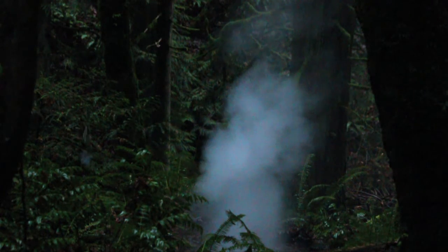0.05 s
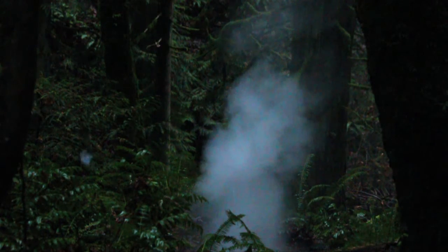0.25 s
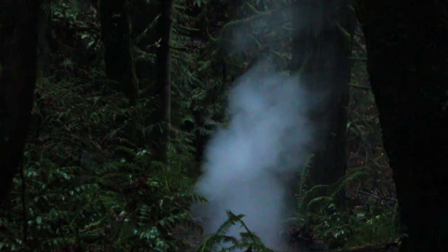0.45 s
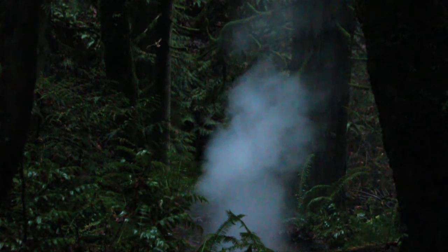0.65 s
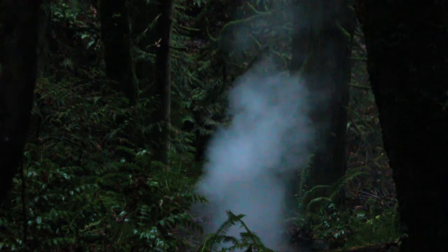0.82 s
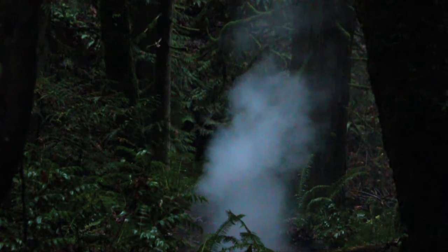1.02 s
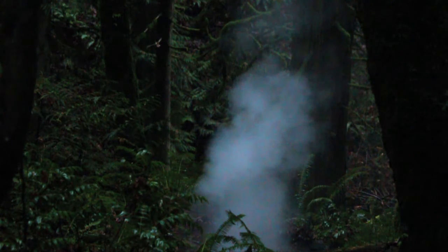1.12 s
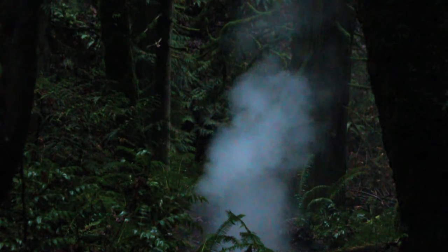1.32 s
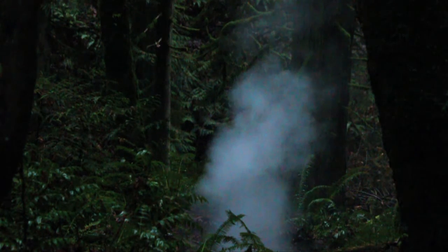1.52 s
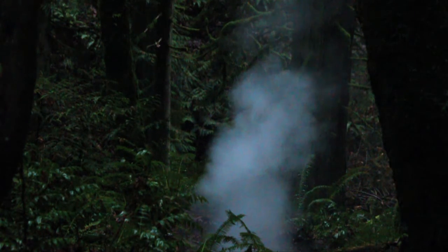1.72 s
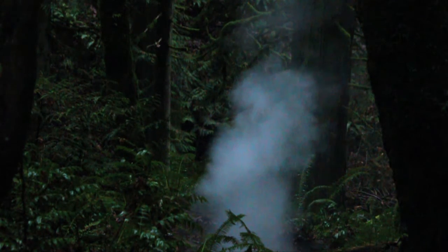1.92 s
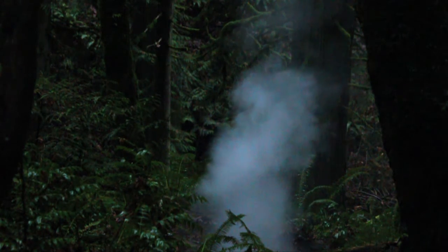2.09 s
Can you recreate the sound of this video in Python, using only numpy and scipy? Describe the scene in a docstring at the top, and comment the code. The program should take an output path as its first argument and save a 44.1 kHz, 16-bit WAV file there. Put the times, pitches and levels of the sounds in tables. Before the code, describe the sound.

Fragments thud and crack onto a forest floor, slowed down, deep and muffled. Knocks begin at about 0.15 seconds, with a hard hit at 0.25 and the heaviest, slightly distorted, at 0.3. From 0.5 to 2 seconds softer, scattered knocks and gritty ticks follow, a little stronger near 1.3 and 1.75. Each echoes briefly among the trees, over a faint low rumble and fine patter of debris.

```python
"""Fragments of a burst pot land in a forest, heard slowed down, so all is deep and dull.
Each gives one push and pull of air, a short ring and some grit; the trees scatter it back.
Fine debris patters over a low rumble and crackles on leaves in a faint hiss.
The hardest blow overloads and flattens at full scale."""
import sys
import numpy as np
from scipy import signal
from scipy.fft import rfft, irfft, next_fast_len
from scipy.io import wavfile
from scipy.ndimage import map_coordinates

SR = 44100
rng = np.random.default_rng(int(sys.argv[2]) if len(sys.argv) > 2 else 0)


def persist_wave(psi):
    """Save psi, clipped to +-1, as 16-bit WAV."""
    counts = np.round(np.clip(psi, -1, 1) * 32767).astype(np.int16)
    wavfile.write(sys.argv[1], SR, np.atleast_2d(counts).T)


N = 94815

# Spectrum of hiss and leaf crackle. Each row: frequency in Hz, level in dB.
HISS_SPECTRUM = [(100, -15), (500, -6.5), (850, 4), (1200, -0.5), (1550, 3.5), (2100, -1), (2600, -48)]


def amp(db):
    """Decibels to gain."""
    return 10 ** (np.asarray(db) / 20)


def filtered(x, response):
    """x filtered by response(hz), a gain."""
    size = next_fast_len(len(x) + 8192)
    return irfft(rfft(x, size) * response(np.fft.rfftfreq(size, 1 / SR)), size)[:len(x)]


def coloured(x, spectrum):
    """x shaped by (Hz, dB) points, at rms 1."""
    points_hz, db = np.transpose(spectrum)
    shaped = filtered(x, lambda hz: amp(np.interp(np.log(hz + 1), np.log(points_hz + 1), db)))
    return shaped / np.sqrt(np.mean(shaped ** 2) + 1e-20)


def noise(spectrum, size=N):
    """Coloured noise at rms 1."""
    return coloured(rng.standard_normal(size), spectrum)


def wobble(knots_per_s):
    """Smooth random curve."""
    return map_coordinates(rng.standard_normal(256), [np.arange(N) * knots_per_s / SR], mode="mirror")


def envelope(points):
    """Gain curve through (s, dB) points."""
    return amp(np.interp(np.arange(N) / SR, *np.transpose(points)))


def thud(t_s, width_ms, rebound_ms):
    """One push of air, then a wider pull that gives most of it back."""
    spread, share = 2.02, 0.88  # pull over push: width, area
    t_ms = t_s * 1000
    push = np.exp(-(t_ms / width_ms) ** 2)
    pull = np.exp(-((t_ms - rebound_ms) / (spread * width_ms)) ** 2)
    return push - share / spread * pull


def rumble():
    """Low rush, wavering slightly."""
    # Each row: frequency in Hz, level in dB.
    spectrum = [(10, -19), (25, 0.5), (60, -3), (115, -0.5), (180, -10), (300, -7), (520, -13),
                (800, -21.5), (2200, -33)]
    return amp(0.4 * wobble(knots_per_s=12.88)) * noise(spectrum)


def hiss():
    """Midrange noise with a flickering level."""
    return amp(2.3 * wobble(knots_per_s=25)) * noise(HISS_SPECTRUM)


def crackle(ticks_per_s=200, spread_db=6):
    """Specks hit leaves: dense ticks coloured like the hiss."""
    when, size = rng.random((int(ticks_per_s * N / SR), 2)).T
    ticks = np.bincount((when * N).astype(int), amp(spread_db * size), N)
    return coloured(ticks, HISS_SPECTRUM)


def patter(thuds_per_s=60, median_width_ms=0.81, spread_db=10):
    """Fine debris lands: tiny thuds at random moments."""
    out = np.zeros(N + SR)
    t_s = np.arange(-256, 768) / SR
    for when, size, width in rng.random((int(thuds_per_s * N / SR), 3)):
        width_ms = median_width_ms * 2 ** (3 * (width - 0.5))
        pulse = thud(t_s, width_ms, rebound_ms=3 * width_ms)
        out[int(when * N):][:len(t_s)] += amp(spread_db * (size + 0.5)) * pulse
    return out[:N]


def background():
    """Rumble with patter and hiss with crackle, each pair on one level curve."""
    # Each row: time in seconds, gain in dB.
    low_levels = [(0.0, -41.5), (0.15, -43.5), (0.32, -40), (0.36, -38.5), (0.52, -50), (0.77, -48),
                  (2.04, -41.5), (2.15, -42.5)]
    high_levels = [(0, -57.5), (.2, -58), (.5, -62), (.7, -66), (1.15, -61.5), (1.35, -66), (1.48, -58.5),
                   (1.55, -52), (1.64, -62), (2.0, -59.5), (2.15, -60.5)]
    low = rumble() + amp(-4.5) * patter()
    high = hiss() + amp(-3.5) * crackle()
    return envelope(low_levels) * low + amp(-1) * envelope(high_levels) * high


def forest_echo(blow, level_db=-18, t60_s=0.52, rise_s=0.0037):
    """Trunks and undergrowth scatter a blow back; level_db is relative to the blow."""
    # Each row: frequency in Hz, echo level in dB.
    spectrum = [(20, -12.5), (70, -6), (130, -0.5), (200, -12.5), (400, 0), (700, -12.5), (1000, -2),
                (2200, -31.5)]
    t_s = np.arange(SR // 2) / SR
    tail = noise(spectrum, len(t_s)) * amp(-60 * t_s / t60_s) * (1 - np.exp(-t_s / rise_s))
    echo = signal.fftconvolve(blow, tail)[:N]
    return amp(level_db) * echo * np.linalg.norm(blow) / (np.linalg.norm(echo) + 1e-12)


def fragments(ring_t60_s=0.035, grit_t60_s=0.028):
    """Each piece thuds, crunches the litter, rings from its rebound on and echoes."""
    # Each row: time in seconds, level in dB, push width in ms, rebound delay in ms,
    # ring pitch in Hz, ring and grit levels in dB relative to the push.
    landings = [ (.1630, -14.5, .33, 2.23, 293, -16, -21.5), (0.172, -15, 0.8, 4.04, 202, -2, -12),
                (.2480, -11.5, 1.34, 3.6, 95, 8.5, -24.5), (0.2495, 0.5, 0.36, 0.79, 410, -9, -33.5),
                (0.2564, -8.5, 0.68, 4.2, 330, -18.5, -24), (.2790, -19.5, 0.49, 3.0, 170, -13, -25.5),
                (.3040, -18.5, 0.42, 2, 400, -2, -46), (0.3185, 6.5, 0.832, 2.5, 117.6, -14, -23),
                (0.322, 2.5, 0.56, 1, 184.5, -1.5, -28.5), (0.355, -18, 2.8, 9.2, 120.2, -17.5, -37),
                (0.3751, -18, 0.62, 0.91, 244, 0, -21), (0.427, -10.5, 1.19, 3.6, 85, 0.5, -35.5),
                (0.5688, -28.5, 0.86, 2.86, 148, 3, -12.5), (0.747, -19.5, 0.29, 1.4, 264.6, -5, -13.5),
                (.7800, -35, 0.3, 3, 300, -6, -14), (.9580, -28.5, 0.8, 4, 129, -11, -27),
                (1.027, -27.5, 0.89, 1, 267, -8, -14.5), (1.2410, -22.5, 0.8, 1.3, 300, -11.5, -28),
                (1.324, -13.5, 1.34, 1.08, 170, -31, -47), (1.5200, -32.5, 0.17, 0.33, 500, -23, -10),
                (1.5880, -30, 0.23, 0.84, 407, -32, -13.5), (1.7075, -20.5, 0.91, 1.86, 280, -8, -23),
                (1.761, -12.5, 0.82, 2.46, 130, -25, -34.5), (1.8290, -34, 0.31, 2.16, 330, -1, -16),
                (2.0127, -25, 1.8, 1.45, 139, 2.5, -18), ]
    # Each row: frequency in Hz, level in dB.
    grit_spectrum = [(20, -24), (200, 8), (800, -3), (1400, -1), (2100, -5.5), (2600, -52.5)]
    out = np.zeros(N)
    for at_s, level_db, width_ms, rebound_ms, ring_hz, ring_db, grit_db in landings:
        t_s = np.arange(N) / SR - at_s
        ring_age_s = np.maximum(t_s - rebound_ms / 1000, 0)
        ring = -np.sin(2 * np.pi * ring_hz * ring_age_s) * amp(ring_db - 60 * ring_age_s / ring_t60_s)
        grit = noise(grit_spectrum) * (t_s > 0) * amp(grit_db - 60 * np.abs(t_s) / grit_t60_s)
        blow = amp(level_db) * (thud(t_s, width_ms, rebound_ms) + ring + grit)
        out += blow + forest_echo(blow)
    return out


def scene():
    """Falling pieces over the forest background, mono."""
    return (fragments() + background())[None]


def record(dry):
    """Cut the treble, flatten peaks at full scale, band-limit the distortion."""
    dull_hz, top_hz, knee_hardness = 2200, 15000, 50
    dull = filtered(dry[0], lambda hz: 1 / np.sqrt(1 + (hz / dull_hz) ** 80))
    flattened = dull / (1 + np.abs(dull) ** knee_hardness) ** (1 / knee_hardness)
    return filtered(flattened, lambda hz: 1 / np.sqrt(1 + (hz / top_hz) ** 30))[None]


dry = scene()
out = record(dry)
persist_wave(out)
```